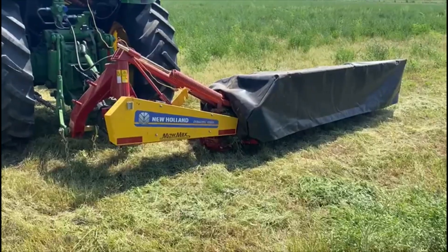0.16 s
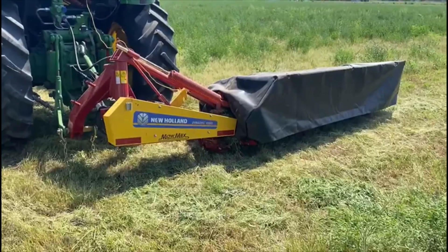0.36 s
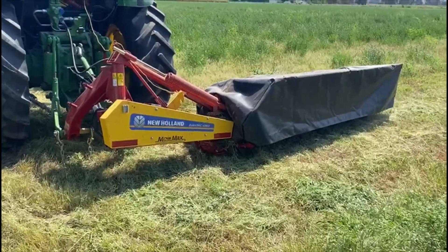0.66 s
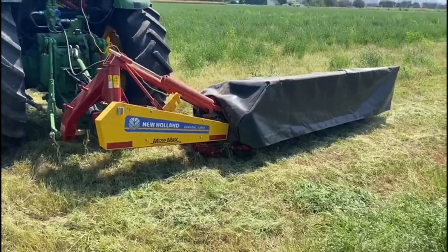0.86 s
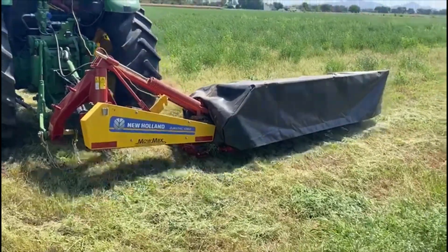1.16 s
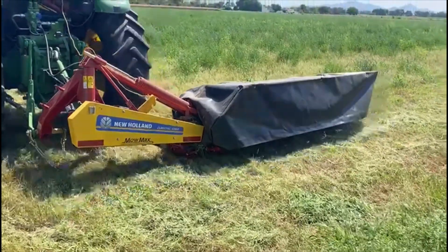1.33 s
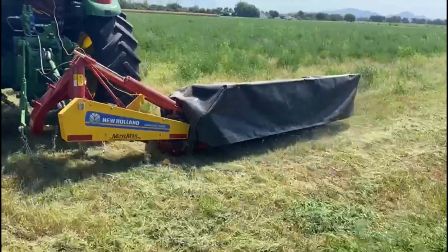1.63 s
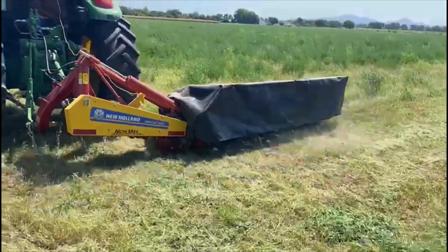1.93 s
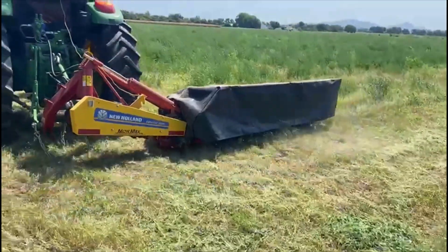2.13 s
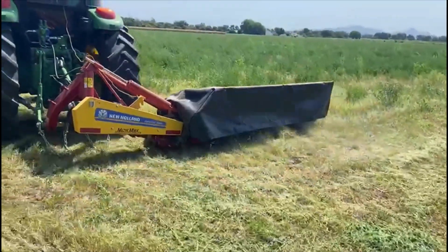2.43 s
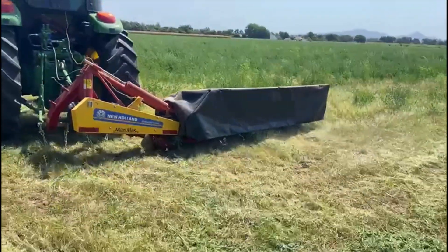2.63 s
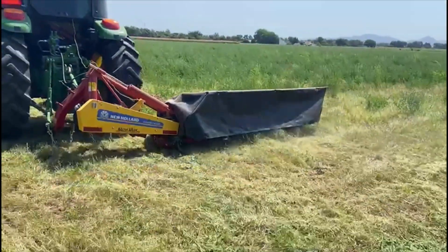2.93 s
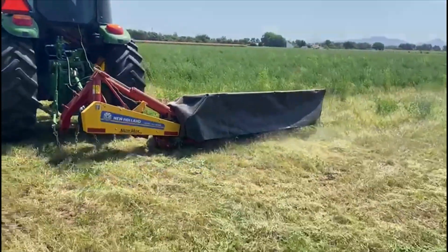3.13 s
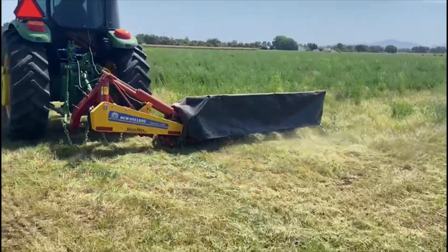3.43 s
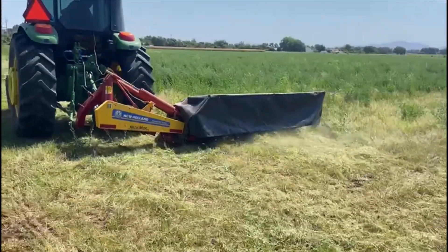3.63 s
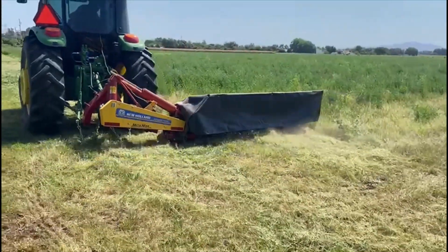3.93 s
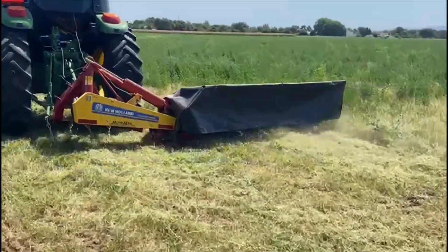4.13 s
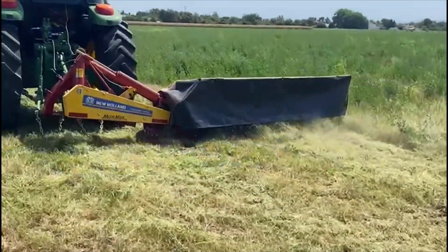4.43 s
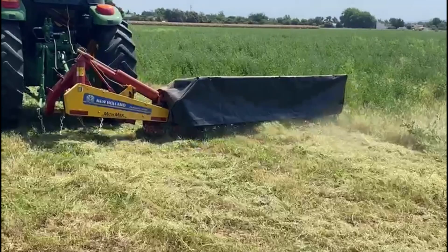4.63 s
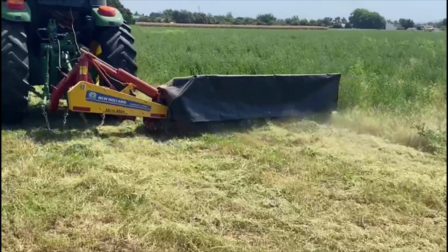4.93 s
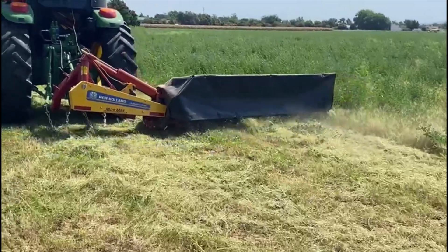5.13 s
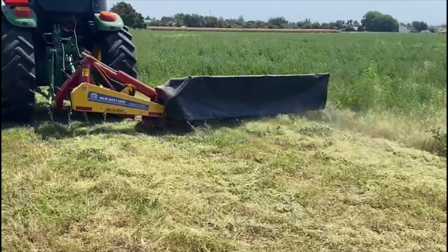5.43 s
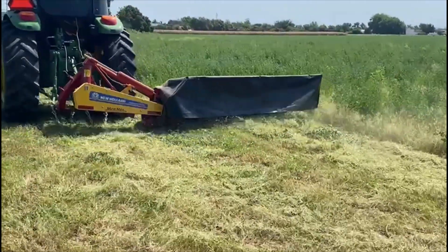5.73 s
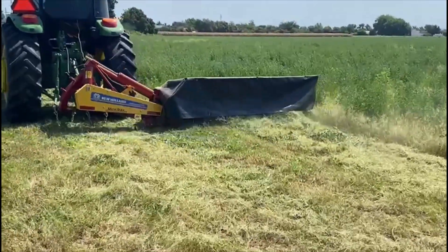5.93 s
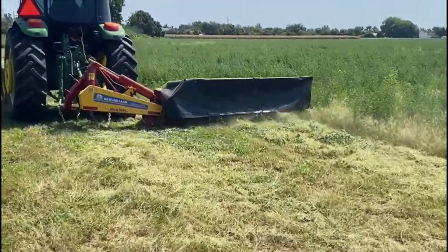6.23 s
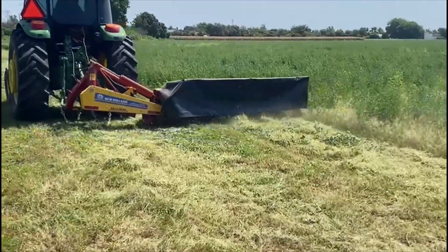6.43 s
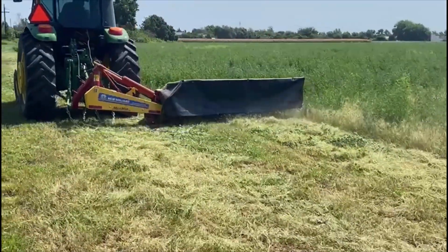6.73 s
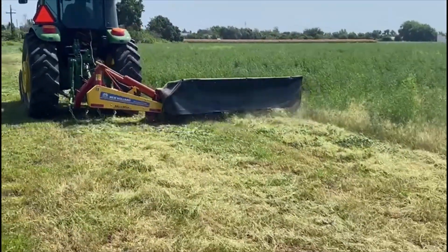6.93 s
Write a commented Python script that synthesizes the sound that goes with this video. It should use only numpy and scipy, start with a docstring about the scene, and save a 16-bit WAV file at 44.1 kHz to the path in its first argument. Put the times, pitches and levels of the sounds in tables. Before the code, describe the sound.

Loud, continuous farm machinery heard from a few metres behind, outdoors and dry. A deep engine throb and clean blade drone carry a nasal, pulsing gear whine, rough metallic rattle and sizzling cut vegetation. It surges briefly, sags, then surges harder to full speed by about two seconds. Afterwards it stays steady, creeping upward in pitch as it moves off, the initially wide image narrowing to the centre.

```python
"""A diesel tractor pulls a disc mower through a standing crop, close to a pair of microphones in an open field.
It draws slowly away. The throttle opens in two steps, the firing tones rise and the discs catch up.
Exhaust and blade beat drone as sums of cosines; gear whines throb with the drive shaft and loose teeth rattle
as noise bands tied to the beat. Random tiny impacts ring the steel, hiss through the stalks and spray the
canvas hood, where short reflections colour the noise."""
import sys
import numpy as np
from scipy import signal
from scipy.fft import rfft, irfft, next_fast_len
from scipy.io import wavfile
from scipy.ndimage import uniform_filter1d, map_coordinates

SR = 44100
rng = np.random.default_rng(int(sys.argv[2]) if len(sys.argv) > 2 else 0)


def master(y):
    """Save y as 16-bit WAV."""
    cut = np.clip(np.atleast_2d(y).T, -1, 1)
    pcm = np.round(cut * 32767)  # scale
    wavfile.write(sys.argv[1], SR, pcm.astype(np.int16))


N = 311346
TIME = np.arange(N) / SR

# Engine speed: time_s, firing_rate_hz
ENGINE_SPEED = [(0, 34.3), (0.2, 37.3), (0.43, 42.8), (0.85, 41.8), (1.29, 40.65), (1.5, 46.04),
                (1.65, 49.23), (1.82, 51.72), (2.2, 52.78), (3, 51.87), (4.3, 52.61), (5.1, 53.28),
                (7.06, 57.7)]
# The exhaust pushes hardest as the throttle opens: time_s, firing_tone_db, octave_db
EXHAUST_PUSH = [(0, -37, -32.5), (0.28, -34, -25), (0.55, -31, -30), (1.18, -35.5, -33.5), (1.52, -29, -28),
                (1.8, -29, -35), (2.1, -32.3, -42), (4.6, -31, -55), (7.06, -32.5, -45)]
# Overtones of the exhaust: multiple_of_firing_rate, level_db (against the base level of the rumble)
EXHAUST_OVERTONES = [(3, -15.5), (4, -29), (6, -10.5)]
# Engine parts: base_db (before trims), load_db (added at full load), fade_db (lost per doubling of distance)
# rumble: gas and chassis; boom: hollow bodywork
ENGINE_LEVELS = {"rumble": (-37, 1, 3.4), "boom": (-38, 0.38, 2.3)}
# Gas and chassis roar: frequency_hz, density_db (per Hz, relative)
RUMBLE_SPECTRUM = [(20, -22), (45, 0), (80, 2.5), (105, 3), (140, 1), (179, -1.5), (215, -2), (300, -2),
                   (385, -4.5), (470, -7.5), (600, -4.5), (900, -4), (2000, -75)]
# The shaking that reaches the bodywork: frequency_hz, density_db (per Hz, relative)
BODY_SHAKE = [(90, -28), (160, -7.5), (178, -1), (200, -7), (300, -28)]
# Hollow boom of the bodywork: frequency_hz, width_hz, level_db
HOLLOWS = [(177.9, 12.6, 1), (173, 38, -6), (208, 11, -6.5)]
# The bodywork shudders as the speed changes: peak_s, boom_rise_db
SHUDDERS = [(0.33, 8.5), (1.05, 2), (1.8, 10)]
SHUDDER_S = 0.12  # time from the peak to half the rise in dB

# The mower follows late through its slipping belt: time_s, blade_beat_hz
MOWER_SPEED = [(0, 50.26), (0.2, 52.57), (0.43, 57.57), (0.68, 61.45), (0.88, 61.54), (1.12, 58.37),
               (1.35, 58.5), (1.52, 61.48), (1.92, 72.6), (2.25, 75.24), (2.65, 74.9), (3.15, 75),
               (3.5, 74.86), (4.3, 75.05), (4.65, 76.76), (5.1, 76.72), (5.45, 78.6), (5.8, 78.3),
               (6.25, 79.53), (7.06, 81.3)]
# Mower parts: base_db (before trims), load_db (added at full load), fade_db (lost per doubling of distance)
# beat, octave, overtones, buffet: blades beating the air, its multiples and the eddies behind the blades
# whine, chatter, groan, gears, rasp: meshes, loose teeth near the main mesh, loaded gears, lesser tones, high bands
# steel: cutter bar and guards; blades: struck stalks; swish: leaves; spray: clippings on the canvas
MOWER_LEVELS = {"beat": (-24, 1.6, 2.84), "octave": (-31.5, -0.62, 0.81), "overtones": (-35.5, 0.91, 2.8),
                "buffet": (-38.5, 0, 1), "whine": (-30, 0.71, 6), "chatter": (-28, 1.6, 3),
                "groan": (-42, 11.6, 2.5), "gears": (-24.5, 0, 8.7), "rasp": (-23.5, 0.75, 13.2),
                "steel": (-27, 1.3, 5.84), "blades": (-29, 0.36, 2.7), "swish": (-27.5, 0.26, 15.2),
                "spray": (-35, 1, 0.35)}
# Overtones of the blade beat: multiple_of_beat, level_db
BEAT_OVERTONES = [(3, -15.5), (4, -10), (5, -10.5), (6, -8.5), (8, -19), (9, -11.5)]
# Air under the hood, answering the beat and then its octave: frequency_hz, width_hz
HOOD_AIR = [(75, 17), (122, 24)]
OCTAVE_FLOOR_DB = -5.5  # off resonance the octave sinks no further than this

# The two gear whines swell and sink: time_s, main_mesh_db, second_mesh_db (added to the whine level)
WHINE = [(0.05, -2, -6), (0.25, 2, 4), (0.5, 2, -2), (0.73, 5.5, -4), (1.05, 2, -23), (1.3, -3, 0),
         (1.58, -1, -5), (1.82, 6, -16), (2.45, 6, -2), (2.8, 1, 0), (3.25, 5.5, -8), (3.8, 3, 1),
         (4.3, 4, -8), (4.9, 8.5, -7), (5.4, 6.5, -8), (5.95, 6, -5), (6.4, -1, -6), (6.7, 5, -10),
         (7.06, 4, -14)]
# Overtones of the main gear mesh: multiple_of_mesh_rate, level_db
MESH_OVERTONES = [(2, -16), (3, -9)]
# Lesser gear tones: multiple_of_beat, level_db
LESSER_GEARS = [(11.5, -11), (12.86, -12), (13.5, -7), (24.6, -16), (25, -19)]
# Swell of the gears' rough noise and lesser tones: time_s, level_db
GEAR_NOISE = [(0, -9), (0.65, 2), (1.15, -3), (1.7, -2), (2.3, 1), (2.9, 0.5), (3.5, 3.5), (4.1, -1.5),
              (4.6, 0.5), (5.2, -4), (7.06, -2)]
# Loose contact around the main mesh: multiple_of_beat, width_hz, level_db
CHATTER = [(12.6, 72, -2), (13.45, 57, -10), (15.1, 63, -10), (12.5, 360, 0.5)]
# Higher bands of loose contact: multiple_of_beat, width_hz, level_db
RASP = [(18.15, 58, -6), (24.7, 107, 2.5), (30.17, 330, 0.5), (37.67, 300, 2.5), (50.4, 86, 1.5),
        (63.9, 81, -3.5)]
# Screaming while the engine drags the discs up to speed: multiple_of_beat, width_hz, level_db
STRAIN = [(18.3, 40, -6), (21.94, 200, -7.5), (25.26, 57, -2.5), (26.93, 87, -1.5), (36.23, 150, -0.5),
          (38.5, 150, 0.5), (41.3, 200, -5)]
# Gears that groan more as the discs gain speed: multiple_of_beat, width_hz, level_db
GROAN = [(8.95, 20, -1), (8, 29, -5.5), (12.6, 38, 2), (6, 63, -6.5)]

# Knocks on the steel: frequency_hz, density_db (per Hz, relative)
STEEL_SPECTRUM = [(300, -7.5), (390, -8.5), (470, -1.5), (600, -5), (750, 1.5), (1000, -3.5), (1300, 1),
                  (1550, -1.5), (1900, -3), (2250, -7), (2800, -8), (4500, -18), (6000, -37), (9000, -67)]
# Ringing of the guards and the cutter bar: frequency_hz, width_hz, level_db
GUARD_MODES = [(551, 15, 6), (788, 16, 8), (1155, 68, 7), (1290, 37, 0.5), (1397, 66, -4.5),
               (1518, 22, 5.5), (1846, 9.9, 2), (2370, 46, -2)]

# The crop comes thick and thin: time_s, stalks_on_blades_db, leaves_swishing_db
CROP = [(0, 1.5, -4.5), (0.75, 0, 1.5), (1.05, -0.5, -2.3), (1.55, 2, -3), (1.9, 0.5, 0.5), (2.55, 1, 2),
        (3.2, 0.8, 2), (4.05, 3.5, -2), (4.5, 6, -3.5), (5.3, 5.5, -1.3), (7.06, 3.5, 0.5)]
# Stalks snapping on the blades: frequency_hz, density_db (per Hz, relative)
SNAP_SPECTRUM = [(1200, -41), (2300, -14), (2600, 0), (2850, 6.5), (3150, 6.5), (3550, 3), (3850, 3),
                 (4200, -7), (4700, -1.5), (5600, -6), (8000, -101)]
# Ringing of the blades: frequency_hz, width_hz, level_db
BLADE_MODES = [(2870, 42, 20), (3040, 91, 0), (3055, 79, 20)]
# Leaves swept past: frequency_hz, density_db (per Hz, relative)
SWISH_SPECTRUM = [(2500, -1), (3700, -4.5), (4200, 7.5), (4700, 6.5), (5200, -4), (7000, -54), (9000, -103)]
# Clippings on the canvas: frequency_hz, density_db (per Hz, relative)
SPRAY_SPECTRUM = [(2000, -33), (4000, 3.5), (5000, 2), (5800, 5.5), (7200, 1.5), (8000, 1), (9000, -30),
                  (9800, -5), (10500, -13.5), (11600, -14.5), (12200, -57)]

# The machine draws away: time_s, distance_m
DISTANCE = [(0, 3.13), (0.7, 4.05), (1.5, 4.22), (4, 5.17), (7.06, 7.63)]
FULL_LOAD_HZ_PER_S = 11.6  # this gain in speed gives about three quarters of full load
LOAD_LAG_S = 0.1  # time constant with which the load builds up and lets go
CANVAS_SWAY_S = 0.00012  # typical shift of each reflection as the canvas sways

# Stereo image, wide and a little left, then narrow and nearly central: time_s, left_minus_right_db, wide_share
IMAGE = [(0, 1.3, 1), (1.8, .7, .95), (3.4, 0.6, .9), (4.0, 0.2, .55), (4.3, 0.1, 0), (7.06, 0.1, 0)]
# Width between the microphones when wide: frequency_hz, side_minus_mid_db
WIDE = [(60, -30), (200, -23), (400, -19), (750, -11), (1000, -13), (1500, -4.5), (2100, -8), (2800, -6),
        (4200, -11), (4800, -6), (5600, -5), (7000, -22)]
# Width between the microphones when narrow: frequency_hz, side_minus_mid_db
NARROW = [(60, -32), (400, -23), (1000, -21), (1500, -14), (2300, -26), (2900, -24), (4300, -37)]
# Left and right out of step in the high treble: frequency_hz, left_lead_deg
TREBLE_PHASE = [(7400, 0), (8000, 90), (8500, 180), (9400, 180), (10200, 90), (10600, 0)]
TOP_HZ = 11800  # upper limit of the treble


def exhaust(hz, db):
    """Three cylinders fire evenly: a firm tone, its octave and faint overtones."""
    firing = angle(hz)
    tone_db, octave_db = curves(EXHAUST_PUSH)
    tone = undb(tone_db) * np.cos(firing) * (1 + 0.06 * wander(7))
    octave = undb(octave_db) * np.cos(2 * firing) * (1 + 0.15 * wander(2.1))
    upper = undb(db["rumble"]) * overtones(hz, EXHAUST_OVERTONES)
    return np.sqrt(2) * (tone + octave + upper)


def rumble(hz, db):
    """Gas and chassis roar in puffs, one to a firing, and the bodywork booms when it shudders."""
    puffs = noise() * (1 + 0.38 * np.cos(angle(hz)))
    roar = unit(colour(puffs, RUMBLE_SPECTRUM)) * undb(db["rumble"] + 6 + 0.42 * shudders())
    boom = ring(colour(noise(), BODY_SHAKE), HOLLOWS, drift=0.0157)
    return roar + boom * undb(db["boom"] + shudders())


def discs(hz, beat, db):
    """The blades beat the air under the hood into a clean drone; at speed their eddies roughen its octave."""
    tone_db = db["beat"] + 1.35 * resonance_db(hz, *HOOD_AIR[0])
    tone = undb(tone_db) * (1 + 0.035 * wander(12)) * np.cos(beat)
    octave_db = db["octave"] + np.maximum(resonance_db(2 * hz, *HOOD_AIR[1]), OCTAVE_FLOOR_DB)
    octave = undb(octave_db) * (1 + 0.3 * wander(12.0)) * np.cos(2 * beat)
    upper = undb(db["overtones"]) * overtones(hz, BEAT_OVERTONES)
    eddies = wander(17.0) * np.cos(2 * beat) + wander(12.0) * np.sin(2 * beat)
    eddies = undb(db["buffet"]) * (hz / hz.max()) ** 4 * eddies
    return np.sqrt(2) * (tone + octave + upper) + eddies


def gear_whine(beat, main_db, second_db, gears_db):
    """The main mesh swells and bends with each shaft turn; a second glides above it among lesser tones."""
    main_angle, second_angle = 12.5 * beat, 18.12 * beat
    main_angle = main_angle + 0.6 * np.sin(shaft_angle(beat)) + 0.34 * wander(9)
    upper = sum(undb(db + 2.5 * wander(4.2)) * np.cos(order * main_angle + 1.33 * wander(13.4))
                for order, db in MESH_OVERTONES)
    main = (np.cos(main_angle) + upper) * undb(main_db - 1.1 + 0.53 * wander(13))
    main = main * shaft_throb(beat, depth=0.49)
    second = np.cos(second_angle + 0.67 * wander(14)) * undb(second_db)
    second = second * shaft_throb(beat, depth=0.52)
    lesser = sum(undb(db + 1.2 * wander(2.2)) * np.cos(order * beat + 1.0 * wander(14))
                 for order, db in LESSER_GEARS)
    return main + second + lesser * shaft_throb(beat, depth=0.14) * undb(gears_db)


def gear_chatter(drive_hz, beat, chatter_db, rasp_db):
    """Loose teeth strike unevenly and smear the mesh tones into bands; speeding up loads them harder."""
    chatter = bands(beat, CHATTER) * shaft_throb(beat, depth=0.054) * undb(chatter_db + 0.5)
    rasp = bands(beat, RASP) * shaft_throb(beat, depth=0.068) * undb(rasp_db)
    # torque follows the gain in speed of engine and discs together, averaged over a quarter of a second
    torque = np.maximum(uniform_filter1d(np.gradient(drive_hz), size=SR // 4), 0)
    strain = bands(beat, STRAIN) * (torque / torque.max()) ** 1.06 * undb(-26.5)
    return (chatter + rasp + strain) * undb(1.6 * wander(27))


def gear_groan(beat, groan_db):
    """Loaded gears groan in rough bands that follow the blade beat."""
    return bands(beat, GROAN) * undb(groan_db)


def clatter(beat, steel_db):
    """Dense knocks shake the cutter bar and ring its steel guards."""
    knocks = unit(colour(ticks(per_second=6000, spread_db=1.5), STEEL_SPECTRUM))
    rings = ring(ticks(per_second=4000, spread_db=5.0), GUARD_MODES, drift=0.00613)
    steel = undb(2.0) * knocks + undb(-4.5) * rings
    return steel * shaft_throb(beat, depth=0.078) * undb(steel_db + 1.0 + 0.5 * wander(3.6))


def cutting(blade_db, swish_db, spray_db):
    """Stalks ring the blades in their thousands and swish past; the clippings spray against the canvas."""
    snaps = unit(colour(ticks(per_second=12000, spread_db=2.0), SNAP_SPECTRUM))
    rings = ring(ticks(per_second=8800, spread_db=6.5), BLADE_MODES, drift=0.025)
    blades = (undb(-0.5) * snaps + undb(-15.5) * rings) * undb(blade_db + 1.26 * wander(18.6))
    swish = unit(colour(noise(), SWISH_SPECTRUM)) * undb(swish_db + 2.0 + 0.5 * wander(9.2))
    spray = unit(colour(ticks(per_second=20000, spread_db=2), SPRAY_SPECTRUM))
    spray = spray * undb(spray_db + 1.25 + 1.0 * wander(16))
    return blades + swish + spray


def hood(x, wet_db, count=10):
    """Short reflections between ground, bar and hood ripple the spectrum, shifting as the canvas sways."""
    lags_s = rng.uniform(1 / 500, 1 / 45, count)
    signs = rng.choice([-1, 1], count)
    echoes = sum(sign * delayed(x, lag + CANVAS_SWAY_S * wander(1.44)) for sign, lag in zip(signs, lags_s))
    echoes = echoes / np.sqrt(count)
    # the canvas lets the low notes out
    echoes = signal.sosfilt(signal.butter(2, 1200, "high", fs=SR, output="sos"), echoes)
    return (x + undb(wet_db) * echoes) / np.hypot(1, undb(wet_db))


def levels(hz, table):
    """Each part's level in dB follows the gain or loss of its speed and falls with distance."""
    pull = np.tanh(np.gradient(hz) * SR / FULL_LOAD_HZ_PER_S)
    step = 1 / (LOAD_LAG_S * SR)
    load = signal.lfilter([step], [1, step - 1], pull)
    metres, = curves(DISTANCE)
    doublings = np.log2(metres / metres[0])
    return {part: base_db + load_db * load - fade_db * doublings
            for part, (base_db, load_db, fade_db) in table.items()}


def shaft_angle(beat):
    """Angle of the drive shaft, which turns far slower than the blades beat."""
    return 0.18 * beat + 2.35


def shaft_throb(beat, depth):
    """The drive shaft runs slightly off centre and presses the teeth together once a turn."""
    return 1 + depth * np.cos(shaft_angle(beat))


def shudders():
    """Brief swells of the bodywork's boom, in dB."""
    return sum(db / (1 + ((TIME - s) / SHUDDER_S) ** 2) for s, db in SHUDDERS)


def resonance_db(hz, centre_hz, width_hz):
    """How far a tone falls as its pitch leaves a resonance."""
    return -10 * np.log10(1 + (2 * (hz - centre_hz) / width_hz) ** 2)


def hollow_gain(hz):
    """How strongly the hollows answer a tone of this pitch."""
    return sum(undb(db) / np.hypot(1, 2 * (hz - centre) / width) for centre, width, db in HOLLOWS)


def overtones(hz, table):
    """Wavering multiples of a rate; they boom where they meet the hollows' pitch."""
    turn = angle(hz)
    total = 0
    for order, db in table:
        gain = undb(db + 2.1 * wander(2.4)) * (1 + 1.4 * hollow_gain(order * hz) ** 2)
        total = total + gain * np.cos(order * turn + 0.62 * wander(10.7))
    return total


def bands(beat, table):
    """Narrow rough bands that ride on the mower's speed, as a direct and a scattered row."""
    out = 0
    for order, width, db in table:
        rows = [wander(width / 2) * np.cos(order * beat) + wander(width / 2) * np.sin(order * beat)
                for _ in range(2)]
        out = out + undb(db) * np.array(rows)
    return unit(out)


def ring(x, modes, drift):
    """Sound a set of resonances whose pitch drifts by a small share as the parts flex."""
    rung = sum(undb(db) * signal.lfilter(*signal.iirpeak(hz, hz / width, fs=SR), x)
               for hz, width, db in modes)
    return unit(delayed(rung, np.cumsum(drift * wander(2.5)) / SR))


def ticks(per_second, spread_db):
    """Random tiny impacts of uneven size, as a direct and a scattered row."""
    struck = rng.random((2, N)) < per_second / SR
    return unit(struck * noise() * undb(spread_db * noise()))


def noise():
    """Two unrelated noises: the direct sound and the part that differs between the microphones."""
    return rng.standard_normal((2, N))


def wander(hz):
    """Smooth random curve with an rms of one that varies up to about this rate."""
    low = signal.butter(2, min(hz, SR / 4), fs=SR, output="sos")
    return unit(signal.sosfilt(low, rng.standard_normal(N)))


def colour(x, points):
    """Filter by a spectrum of frequency_hz, level_db points, joined on a log frequency scale."""
    size = next_fast_len(N)
    hz, db = np.transpose(points)
    bins_hz = np.maximum(np.arange(size // 2 + 1) * SR / size, 1)
    gain = undb(np.interp(np.log(bins_hz), np.log(hz), db))
    return irfft(rfft(x, size) * gain, size)[..., :N]


def delayed(x, lag_s):
    """Both rows heard late by a changing time."""
    return np.array([map_coordinates(row, [(TIME - lag_s) * SR], order=1, mode="mirror") for row in x])


def angle(hz):
    """Angle in radians turned at a changing rate."""
    return 2 * np.pi * np.cumsum(hz) / SR


def curves(table):
    """Each column after the time as one value per sample."""
    s, *columns = np.transpose(table)
    return [np.interp(TIME, s, c) for c in columns]


def unit(x):
    """Scale to an rms of one."""
    return x / np.sqrt(np.mean(x ** 2))


def undb(db):
    """Decibels to gain."""
    return 10 ** (np.asarray(db) / 20)


def scene():
    """Tones come from the middle; the noisy parts of engine and mower spread across the machine."""
    (engine_hz,), (mower_hz,) = curves(ENGINE_SPEED), curves(MOWER_SPEED)
    engine_db, db = levels(engine_hz, ENGINE_LEVELS), levels(mower_hz, MOWER_LEVELS)
    beat = angle(mower_hz)
    (main_db, second_db), (rough_db,) = curves(WHINE), curves(GEAR_NOISE)
    stalks_db, leaves_db = curves(CROP)

    tones = exhaust(engine_hz, engine_db) + discs(mower_hz, beat, db)
    tones = tones + gear_whine(beat, db["whine"] + main_db, db["whine"] + second_db, db["gears"] + rough_db)

    drive = rumble(engine_hz, engine_db)
    drive = drive + gear_chatter(engine_hz + mower_hz, beat, db["chatter"] + rough_db,
                                 db["rasp"] + 0.69 * rough_db)
    drive = drive + gear_groan(beat, db["groan"]) + clatter(beat, db["steel"])

    # the more stalks and leaves are cut, the more clippings fly
    spray_db = db["spray"] + 0.51 * stalks_db + 0.45 * leaves_db
    crop = cutting(db["blades"] + stalks_db, db["swish"] + leaves_db, spray_db)
    crop = crop * shaft_throb(beat, depth=0.045)

    mid, spread = hood(drive + crop, wet_db=-10.5)
    left_db, wide = curves(IMAGE)
    wide = np.clip(wide, 0, 1)
    side = wide * colour(spread, WIDE) + (1 - wide) * colour(spread, NARROW)
    left = (mid + side) * undb(left_db / 2)
    right = (mid - side) * undb(-left_db / 2)
    return tones + np.array([left, right])


def record(dry):
    """Left and right fall out of step in the high treble, and a steep filter cuts the top."""
    size = next_fast_len(N)
    bins_hz = np.arange(size // 2 + 1) * SR / size
    lead = np.radians(np.interp(bins_hz, *np.transpose(TREBLE_PHASE)))
    # half the lead goes to each side
    turned = rfft(dry, size) * np.exp(0.5j * np.array([lead, -lead]))
    heard = irfft(turned, size)[:, :N]
    return signal.sosfilt(signal.ellip(8, 0.2, 70, TOP_HZ, fs=SR, output="sos"), heard)


dry = scene()
out = record(dry)
master(out)
```